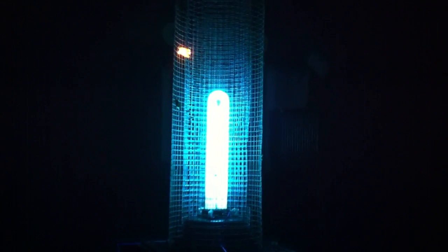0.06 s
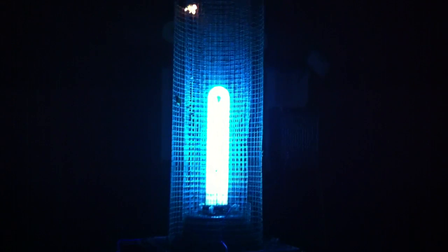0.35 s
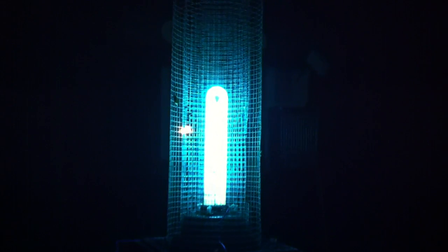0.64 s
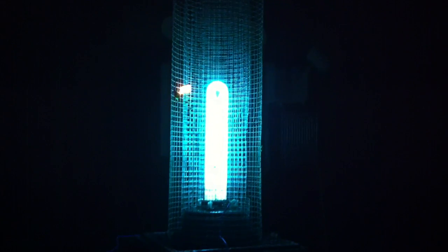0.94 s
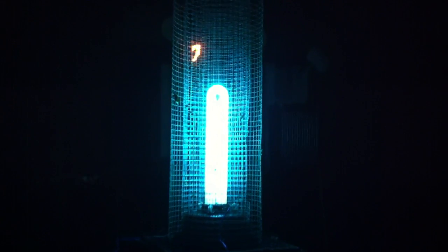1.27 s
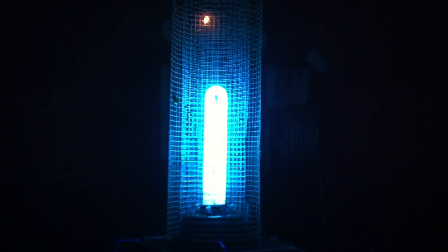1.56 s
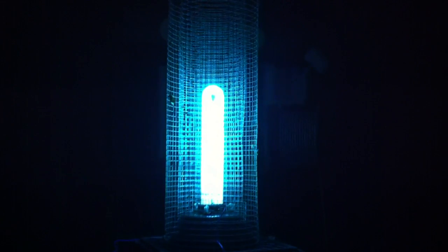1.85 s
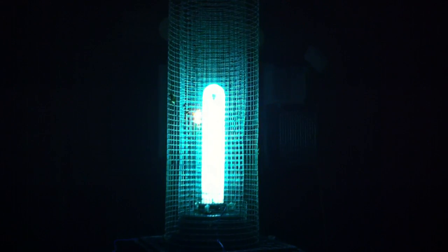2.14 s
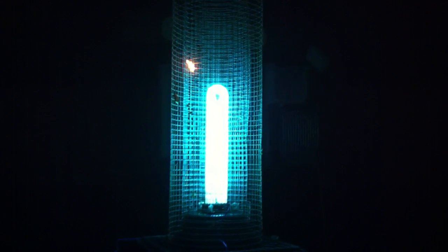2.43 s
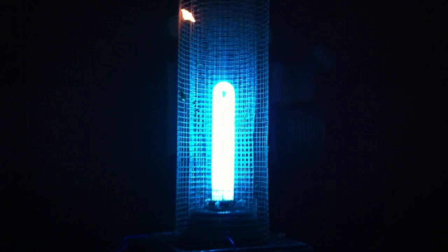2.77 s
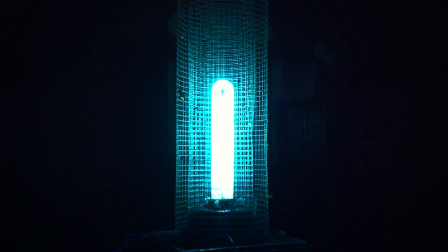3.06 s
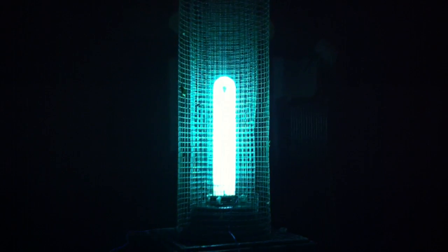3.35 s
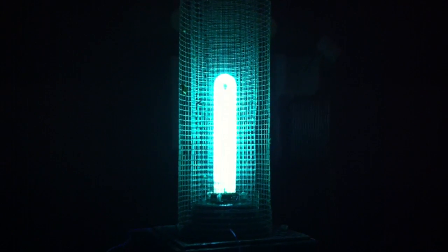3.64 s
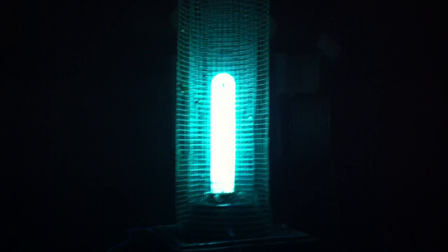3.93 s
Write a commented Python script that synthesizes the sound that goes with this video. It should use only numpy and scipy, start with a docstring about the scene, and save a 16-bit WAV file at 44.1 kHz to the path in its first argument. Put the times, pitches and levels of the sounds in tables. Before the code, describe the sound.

A bug zapper crackles and sizzles close by as an insect burns on its mesh. The buzzing arc breaks off twice with sharp snaps and ends in a double snap, leaving a faint hum in a night yard.

```python
"""An insect burns on the high-voltage mesh of a lamp trap, close to the microphone in a yard at night.
The arc strikes on every half cycle of the mains and sizzles in between; now and then it spits a volley
of restrikes. It breaks off twice and ends in a double snap that dies away between nearby walls,
leaving a faint corona buzz, transformer hum and, far off, crickets."""
import sys
import numpy as np
from scipy import signal
from scipy.fft import rfft, irfft, next_fast_len
from scipy.io import wavfile
from scipy.ndimage import uniform_filter1d, map_coordinates

SR = 44100
rng = np.random.default_rng(int(sys.argv[2]) if len(sys.argv) > 2 else 0)


def waveform_to_disk(signal):
    """Save audio, clipped to [-1, 1], as 16-bit WAV at the path in sys.argv[1]."""
    frames = np.transpose(np.atleast_2d(signal))
    scaled = np.clip(frames, -1, 1) * 32767
    samples = np.round(scaled).astype(np.int16)
    wavfile.write(sys.argv[1], SR, samples)


N = 176400

# still night air (frequency [Hz], relative level [dB])
AIR_COLOUR = [(25, 10), (65, -13), (110, -1), (175, 7), (260, -1), (500, -2), (1400, -7.5), (3000, -8),
              (8000, -4.5), (15500, -0.5)]
# walls near the trap (delay [s], smear [s], level [dB])
WALLS = [(.0004, .002, -13), (.0065, .003, -12), (.0135, .004, -8.5)]
# diffuse tail of the yard (frequency [Hz], t60 [s])
YARD_DECAY = [(200, 0.097), (800, 0.41), (2000, 0.37), (5500, 0.39), (14600, 0.31)]
# transformer under load (mains harmonic [number], level in burn 1 [dB], burn 2 [dB], burn 3 [dB])
LOAD_HUM = [(4, -72, -72.5, -77), (6, -75, -77, -81), (8, -84, -88, -77), (10, -77, -82, -85),
            (12, -72.5, -73, -75), (14, -78, -78, -80), (18, -79, -79, -77)]
# idling transformer (mains harmonic [number], level [dB])
IDLE_HUM = [(2, -90), (4, -93.5), (6, -81.5), (8, -94), (10, -103)]
# corona puffs in each mains cycle (phase [cycles], width [cycles], level [dB])
CORONA_PUFFS = [(.16, 0.035, -105), (.70, 0.038, -58)]
# modes of the mesh wires (frequency [Hz], level [dB], t60 [s])
WIRE_MODES = [(3100, -34, .07), (6050, -25, .07), (9150, -27, .08)]
# sizzle and corona hiss (frequency [Hz], relative level [dB])
SIZZLE_COLOUR = [(30, -64), (200, -18), (1000, -12), (2300, -2.5), (3400, -2), (5500, 4), (7400, 5.5),
                 (10000, 3.5), (12500, 5), (14200, 6.5), (15800, -11)]
# course of the sizzle before surges and clumps (time [s], level [dB])
SIZZLE_LEVELS = [(0, -48), (.05, -38.5), (.23, -43.5), (.33, -41.5), (.37, -36), (.46, -41), (.55, -29.5),
                 (.58, -53), (.64, -50), (.68, -37.5), (.75, -46), (.95, -46.5), (1.11, -51), (1.18, -50),
                 (1.39, -37.5), (1.55, -45), (1.66, -38.5), (1.76, -44), (1.88, -37.5), (2.01, -50),
                 (2.04, -43), (2.11, -44.5), (2.16, -38.5), (2.22, -48), (2.3, -42), (2.5, -46.5),
                 (2.58, -42), (2.68, -42.5), (2.77, -38.5), (2.82, -48), (2.88, -43), (2.92, -43),
                 (2.97, -45.5), (3.03, -44), (3.1, -37)]
# puff of hot gas (frequency [Hz], relative level [dB])
POP_COLOUR = [(30, -26), (100, -16), (220, 3.5), (400, -12), (650, -27), (1050, -13), (1500, -16),
              (1900, 8), (3500, 7), (15000, -3.5)]
# one spark (frequency [Hz], relative level [dB])
SPARK_COLOUR = [(30, -45), (100, -25.5), (250, -28), (600, -18.5), (1300, -16), (2200, -6.5), (2800, -8.5),
                (3500, -4), (5500, 1), (7400, 0), (9000, 4), (12000, 4), (15500, -1)]
# spells in which the arc burns (start [s], end [s])
BURNS = [(.0050, .582), (.6215, 1.89), (1.9783, 3.112)]
# strength of the strikes (time [s], relative level [dB])
STRIKE_LEVELS = [(0.005, -5), (0.047, -8.5), (0.113, -6.9), (0.238, -9.5), (0.255, -7.5), (0.297, -6),
                 (0.338, -1.5), (0.355, -22), (0.363, -7), (0.438, -11.5), (0.496, -4), (0.513, -9.5),
                 (0.571, -7.5), (0.646, -11.5), (0.655, -12.5), (0.688, -8.5), (0.705, -19), (0.838, -12.5),
                 (1.13, -10), (1.163, -7.5), (1.196, -7.5), (1.255, -6), (1.28, -11.5), (1.346, -11),
                 (1.363, -9), (1.379, -8.7), (1.421, -7.5), (1.446, -14.5), (1.588, -15.5), (1.663, -11.5),
                 (1.738, -18.5), (1.854, -14), (1.888, -5), (1.978, -14), (1.987, -19), (2.02, -12.5),
                 (2.053, -5.5), (2.07, -12.5), (2.095, -8), (2.103, -14.5), (2.17, -8), (2.195, -16),
                 (2.295, -13), (2.311, -14), (2.32, -16), (2.37, -12.5), (2.578, -12.5), (2.603, -9),
                 (2.62, -17), (2.636, -13), (2.745, -9), (2.761, -7), (2.786, -9), (2.795, -10.5),
                 (2.811, -7.5), (2.886, -11), (2.928, -11), (3.003, -5), (3.011, -8), (3.019, -12.3),
                 (3.103, -3.5), (3.111, -30)]
# short volleys of restrikes (time [s], length [s], level [dB])
SPITS = [(.2050, .0012, -9), (.3135, .0007, -11), (.3384, .001, -7.5), (.6548, .0006, -13),
         (.7877, .001, -15.5), (1.1545, .0009, -11), (1.171, .001, -13), (1.2377, .0007, -10.5),
         (1.9640, .0008, -15), (2.7946, .001, -9.5), (2.8782, .0012, -9), (2.8861, .0012, -9.5),
         (2.9362, .001, -14.5), (2.9862, .0008, -15), (3.7262, .0006, -39), (3.7431, .0008, -41)]
# volleys as the body bursts (time [s], length [s], level [dB], spark gap [s],
# puff level [dB], fizz level [dB], thump frequency [Hz], thump level [dB])
SNAPS = [(.5868, .0045, -3, .00035, -22, -20, 200, -61), (1.8947, .0056, -2, .00019, 2, -16.5, 220, -44),
         (1.9693, .0034, -8.5, .00016, -28, -31, 200, -60), (2.8696, .0013, -7, .00019, -19, -33, 380, -61),
         (3.0945, .0003, -12, .0003, -16, -38, 380, -55), (3.1275, .0072, -4, .00036, -19, -22, 210, -52),
         (3.1440, .0065, -.5, .00035, -15, -15, 1080, -39)]

MAINS_HZ = 60.03
SPARK_SCATTER_DB, RESTRIKE_GAP_S = 1.5, .00016


def amp(db):
    """Decibels to gain."""
    return 10 ** (np.asarray(db) / 20)


def unit(x):
    """Scale to rms 1."""
    return x / np.sqrt(np.mean(x ** 2) + 1e-20)


def along(points, hz):
    """Interpolate (frequency [Hz], value) points on a log axis."""
    freqs, values = np.transpose(points)
    return np.interp(np.log(hz + 1), np.log(freqs + 1), values)


def filtered(x, response):
    """Filter x by a gain that depends on frequency."""
    size = next_fast_len(N + SR // 2)
    return irfft(rfft(x, size) * response(np.fft.rfftfreq(size, 1 / SR)), size)[:N]


def noise(response):
    """Filtered noise of rms 1."""
    return unit(filtered(rng.standard_normal(N), response))


def drift(t, per_s, order=3):
    """A curve through per_s random values a second."""
    return map_coordinates(rng.standard_normal(int(t[-1] * per_s) + 2), [t * per_s], order=order)


def burn_gates(t):
    """One gate per burn: 1 while it lasts, else 0."""
    return [1. * ((t >= start) & (t < end)) for start, end in BURNS]


def clicks(times, gains, colour, size=4096):
    """Minimum-phase clicks of unit energy, placed at the times and scaled by the gains."""
    cepstrum = irfft(np.log(amp(along(colour, np.fft.rfftfreq(size, 1 / SR)))))
    cepstrum[1:size // 2] *= 2
    cepstrum[size // 2 + 1:] = 0
    click = irfft(np.exp(rfft(cepstrum)))
    samples = np.clip(np.round(np.asarray(times) * SR), 0, N).astype(int)
    train = np.bincount(samples, gains, N + 1)[:N]
    return signal.fftconvolve(train, click / np.linalg.norm(click))[:N]


def night(air_db=-63, cricket_db=-70, cricket_hz=2440, half_width_hz=100):
    """Still air around the microphone and the narrow band of a cricket chorus far off."""
    air = noise(lambda hz: amp(along(AIR_COLOUR, hz)))
    crickets = noise(lambda hz: 1 / (1 + ((hz - cricket_hz) / half_width_hz) ** 4) ** .5)
    return amp(air_db) * air + amp(cricket_db) * crickets


def wall_response():
    """Each nearby wall sends a smeared reflection to the microphone."""
    age = np.arange(SR // 16) / SR
    response = np.zeros(len(age))
    for delay, smear, db in WALLS:
        wall = rng.standard_normal(len(age)) * (age >= delay) * np.exp(-abs(age - delay) / smear)
        response += amp(db) * wall / np.linalg.norm(wall)
    return response


def tail_response(db=-12.5):
    """The diffuse tail of the yard; its bass dies first."""
    hz, age, spectra = signal.stft(rng.standard_normal(SR // 2), SR, nperseg=256)
    decay = amp(-60 * age / along(YARD_DECAY, hz)[:, None])
    tail = signal.istft(spectra * decay, SR, nperseg=256)[1]
    return amp(db) * tail / np.linalg.norm(tail)


def yard(x, t, wander_s=.25, tail_hop_s=.0025, count=12):
    """Reflections shift slowly as the arc wanders over the mesh; the tail differs from spark to spark."""
    echoes = np.zeros(N)
    for hop, response in [(wander_s, wall_response), (tail_hop_s, tail_response)]:
        for k in range(count):
            crossfade = np.sin(np.pi / 2 * np.minimum((t / hop - k) % count, 2))
            echoes += signal.oaconvolve(x * crossfade, response())[:N]
    return echoes


def transformer(t, waver_db=2.5, waver_per_s=9):
    """Wavering mains harmonics, stronger under load and differently coloured in each burn."""
    def harmonic(k, db):
        gain = amp(db + waver_db * drift(t, waver_per_s, order=1))
        return gain * np.sqrt(2) * np.sin(2 * np.pi * (k * MAINS_HZ * t + rng.random()))

    loads = [uniform_filter1d(gate, size=400) for gate in burn_gates(t)]
    loaded = sum(load * harmonic(k, dbs[burn]) for burn, load in enumerate(loads) for k, *dbs in LOAD_HUM)
    idle = sum(harmonic(k, db) for k, db in IDLE_HUM)
    return loaded + (1 - sum(loads)) * idle


def corona(t, scatter_db=2.5):
    """The live mesh hisses in short puffs near the voltage peaks."""
    cycle, phase = np.divmod(t * MAINS_HZ, 1)
    swell = np.zeros(N)
    for centre, width, db in CORONA_PUFFS:
        gains = amp(db + scatter_db * rng.standard_normal(int(cycle[-1]) + 1))
        swell += gains[cycle.astype(int)] * np.exp(-.5 * ((phase - centre) / width) ** 2)
    return swell * noise(lambda hz: amp(along(SIZZLE_COLOUR, hz)))


def cooling_tick(at_s=3.2955, db=-31):
    """The cooling body gives one dull tick."""
    return clicks([at_s], [amp(db)], POP_COLOUR)


def wires(t, at_s=1.8947):
    """The mesh rings briefly under the hardest snap."""
    age = np.maximum(t - at_s, 0)
    return sum(amp(db - 60 * age / t60) * np.sin(2 * np.pi * hz * age) for hz, db, t60 in WIRE_MODES)


def pops(puff_decay_s=.0067, fizz_decay_s=.011, thump_rise_s=.004, size=2200):
    """Each snap throws out a dull puff of hot gas with a hollow thump, and fizzes out."""
    age = np.arange(size) / SR
    thump_shape = age / thump_rise_s * np.exp(1 - age / thump_rise_s)
    times, puffs, fizzes, thumps = [], [], [], np.zeros(N)
    for start, *_, puff_db, fizz_db, thump_hz, thump_db in SNAPS:
        times.extend(start + age)
        puff = unit(rng.standard_normal(size) * np.exp(-age / puff_decay_s))
        puffs.extend(amp(puff_db) * puff / np.sqrt(size))
        fizzes.extend(amp(fizz_db) * unit(rng.laplace(size=size)) * np.exp(-age / fizz_decay_s))
        thump = thump_shape * np.sin(2 * np.pi * thump_hz * age)
        thumps[round(start * SR):][:size] += amp(thump_db) * thump
    return clicks(times, puffs, POP_COLOUR) + clicks(times, fizzes, SPARK_COLOUR) + thumps


def sizzle(t, sparks_per_s=9800, spread_db=9, surge_db=4, lag_s=.0043, clump_db=1.8):
    """Countless tiny sparks on the burning body come in ragged clumps and surge with the current."""
    sizes = amp(spread_db * rng.standard_normal(N)) * rng.choice([-1, 1], N)
    sizes *= rng.random(N) < sparks_per_s / SR
    gates = burn_gates(t)
    # the surge peaks lag_s after each strike
    surge = sum(gate * np.cos(4 * np.pi * MAINS_HZ * (t - start - lag_s))
                for gate, (start, _) in zip(gates, BURNS))
    db = np.interp(t, *np.transpose(SIZZLE_LEVELS)) + surge_db * surge + clump_db * drift(t, per_s=220)
    return unit(clicks(t, sizes, SIZZLE_COLOUR)) * uniform_filter1d(sum(gates), size=64) * amp(db)


def volley(start, length, db, gap=RESTRIKE_GAP_S, count=48):
    """Restrikes at uneven gaps that add up like noise, as rows (time [s], gain [linear])."""
    gaps = gap * rng.uniform(.35, 1.65, count)
    age = np.cumsum(gaps) - gaps[0]
    gains = amp(db + SPARK_SCATTER_DB * rng.standard_normal(count)) * rng.choice([-1, 1], count)
    return np.column_stack([start + age, gains * np.clip((length - age) / gap, 0, 1)])


def arc(t_jitter_s=.00009, boost_db=1, stutter_share=.55, max_stutter_s=.0008, stutter_db=-10):
    """The arc strikes once per half cycle, often with a stutter; spits and snaps come at set times."""
    times = np.concatenate([np.arange(start, end, .5 / MAINS_HZ) for start, end in BURNS])
    count = len(times)
    times += t_jitter_s * rng.standard_normal(count)
    levels = np.interp(times, *np.transpose(STRIKE_LEVELS)) + boost_db
    levels += SPARK_SCATTER_DB * rng.standard_normal(count)
    strikes = np.column_stack([times, amp(levels)])
    lengths = max_stutter_s * rng.random(count) * (rng.random(count) < stutter_share)
    stutters = [volley(at + RESTRIKE_GAP_S, length, db + stutter_db)
                for at, length, db in zip(times, lengths, levels)]
    spits = [volley(*row) for row in SPITS]
    snaps = [volley(*row[:4]) for row in SNAPS]
    return clicks(*np.vstack([strikes, *stutters, *spits, *snaps]).T, SPARK_COLOUR)


def scene():
    """One microphone near the trap, with the yard's echoes and the quiet night behind it."""
    t = np.arange(N) / SR
    trap = arc() + pops() + wires(t) + cooling_tick() + sizzle(t) + corona(t)
    return (trap + yard(trap, t) + transformer(t) + night())[None]


def record(dry, limit_db=-23, attack_s=.03, release_s=.052, clip_db=-2, low_cut_hz=70, top_hz=16100):
    """The recorder ducks after loud snaps, rounds off the peaks, thins the bass and cuts the very top."""
    x = dry[0]
    window = round(attack_s * SR)
    level = np.sqrt(abs(signal.fftconvolve(x ** 2, np.ones(window) / window)[:N]))
    excess = np.log(np.maximum(level / amp(limit_db), 1))
    release = np.arange(N) / SR / release_s
    # ducking follows each peak of the excess, then lets go exponentially
    ducking = np.exp(np.maximum.accumulate(np.log(excess + 1e-12) + release) - release)
    x = x * np.exp(-ducking)
    x = x / (1 + (x / amp(clip_db)) ** 4) ** .25
    x = signal.lfilter(*signal.butter(1, low_cut_hz, 'high', fs=SR), x)
    return filtered(x, lambda hz: np.clip((top_hz - hz) / 300 + .5, 0, 1))[None]


dry = scene()
out = record(dry)
waveform_to_disk(out)
```